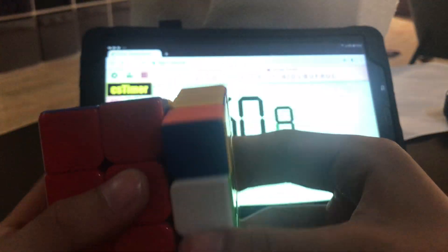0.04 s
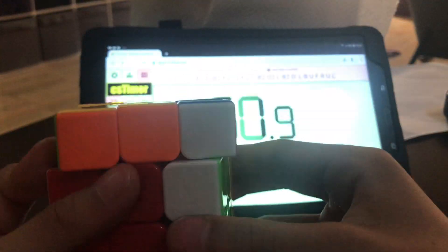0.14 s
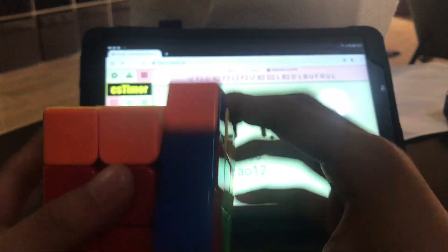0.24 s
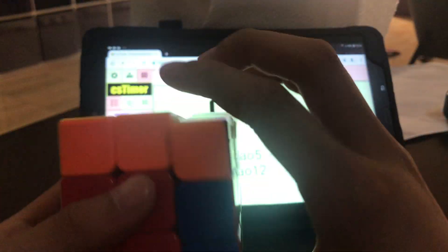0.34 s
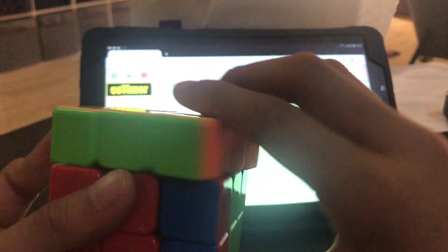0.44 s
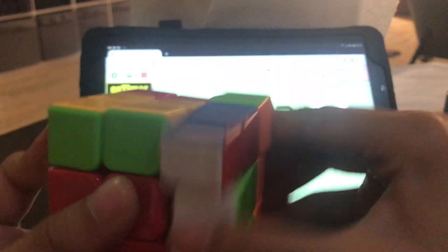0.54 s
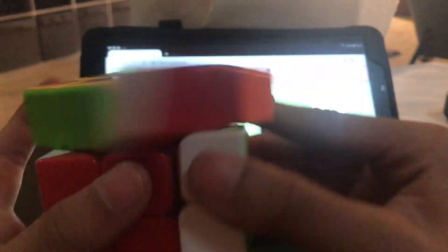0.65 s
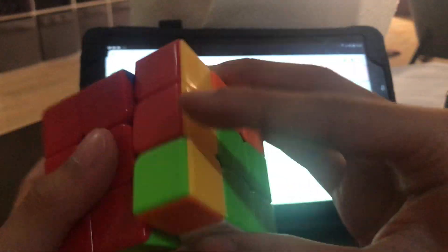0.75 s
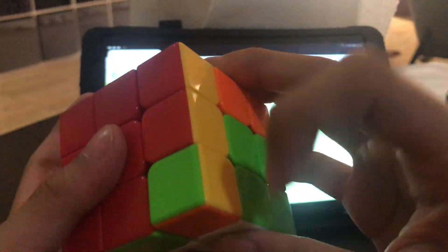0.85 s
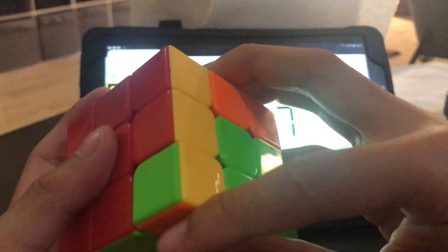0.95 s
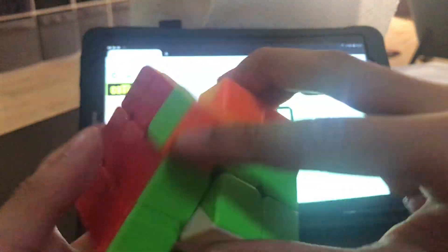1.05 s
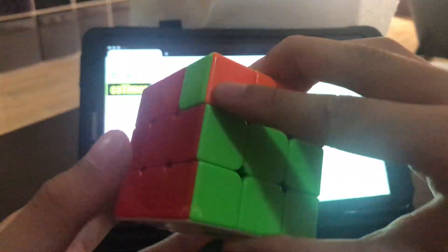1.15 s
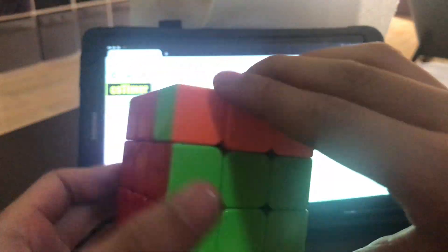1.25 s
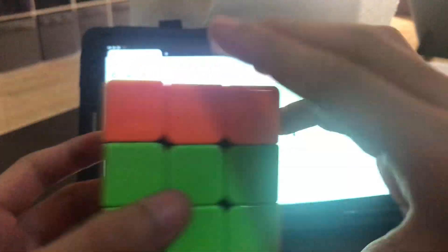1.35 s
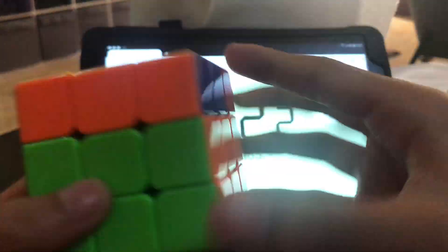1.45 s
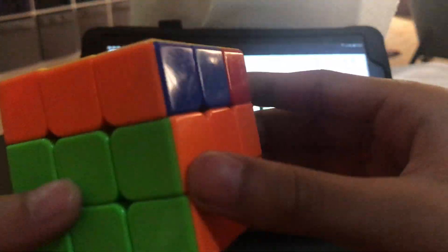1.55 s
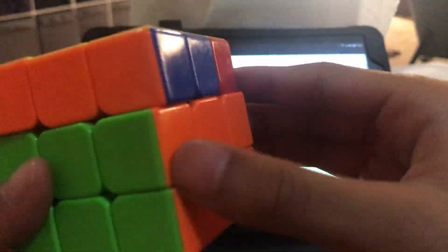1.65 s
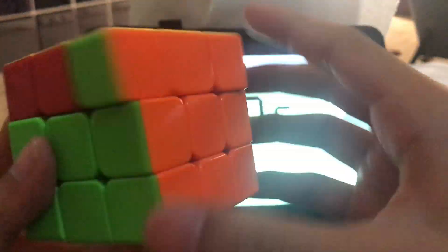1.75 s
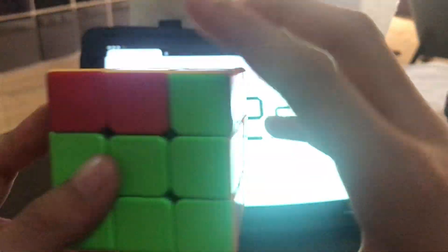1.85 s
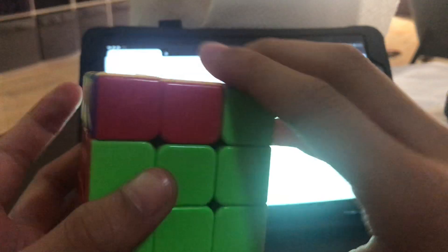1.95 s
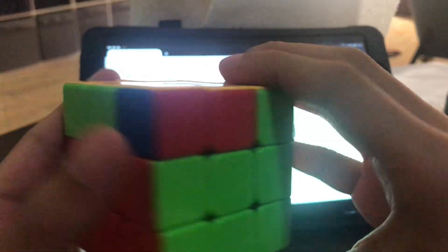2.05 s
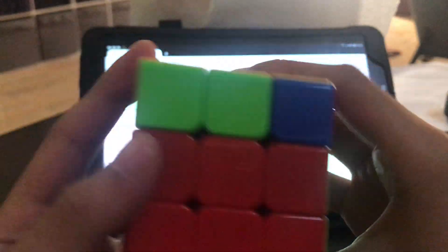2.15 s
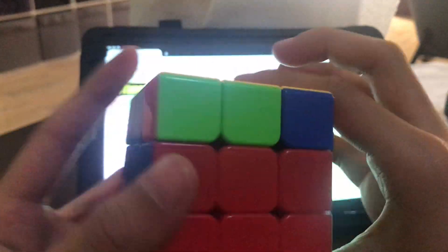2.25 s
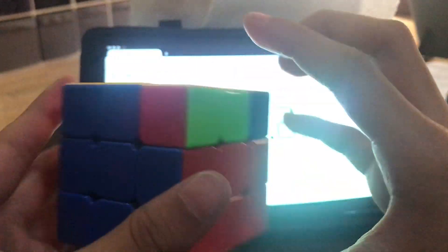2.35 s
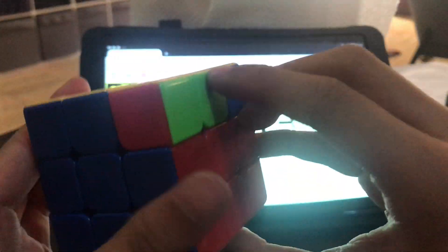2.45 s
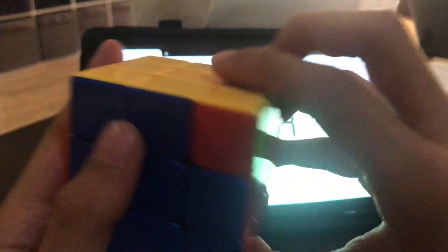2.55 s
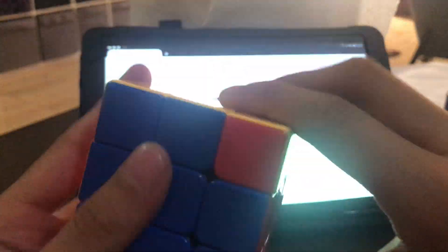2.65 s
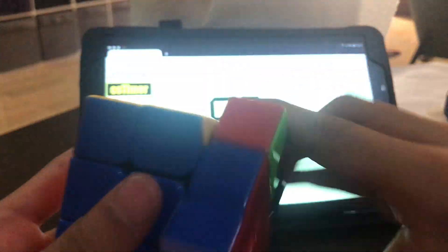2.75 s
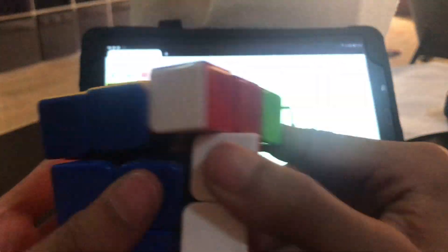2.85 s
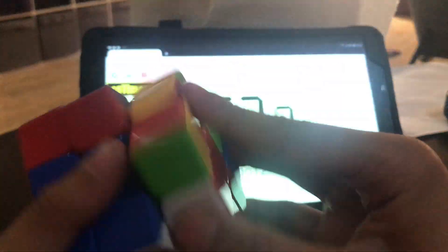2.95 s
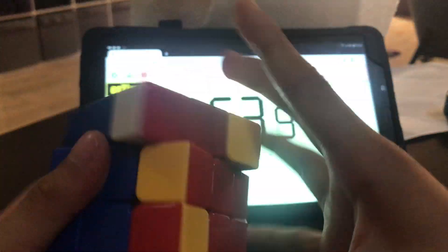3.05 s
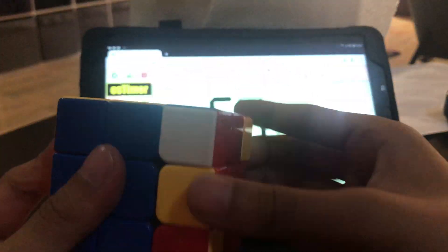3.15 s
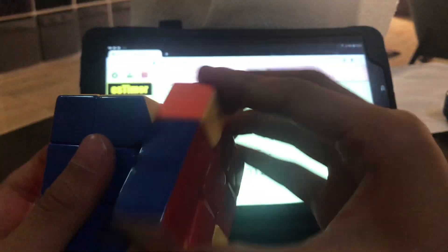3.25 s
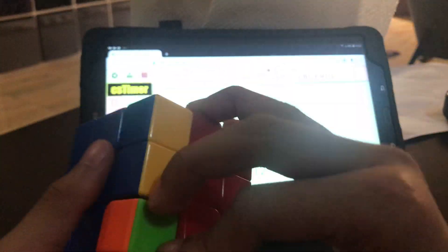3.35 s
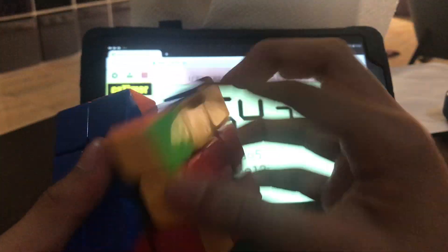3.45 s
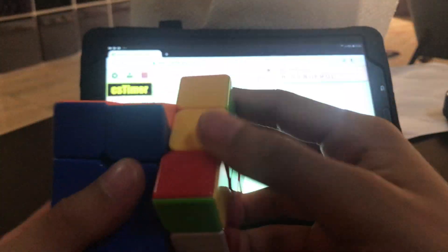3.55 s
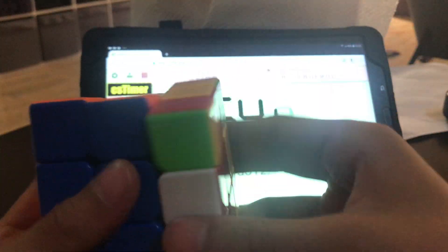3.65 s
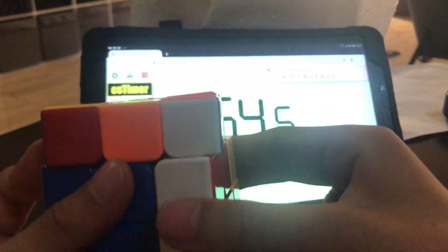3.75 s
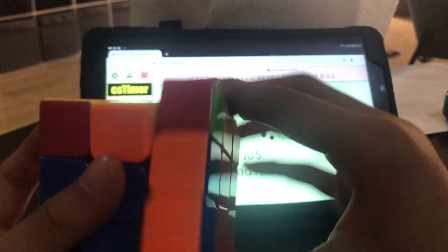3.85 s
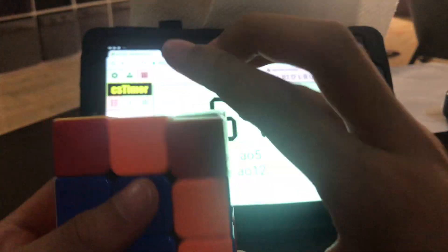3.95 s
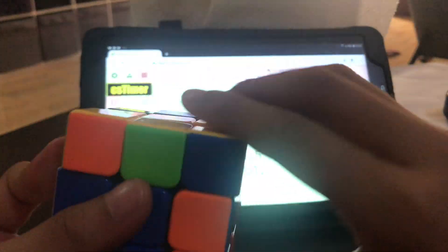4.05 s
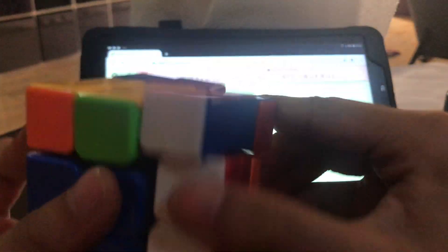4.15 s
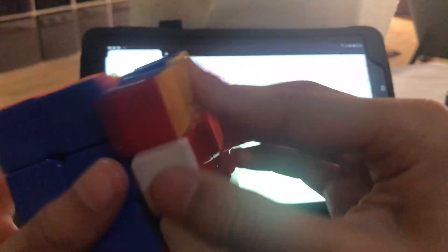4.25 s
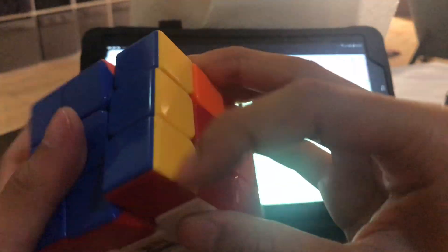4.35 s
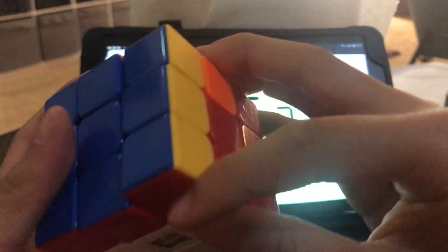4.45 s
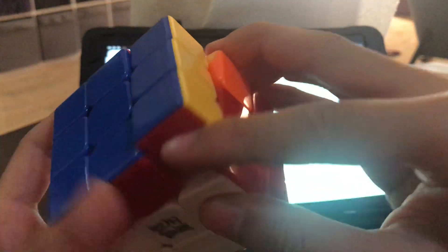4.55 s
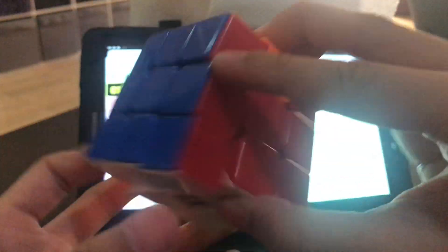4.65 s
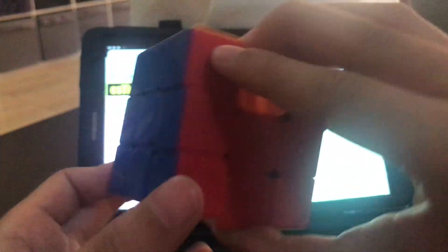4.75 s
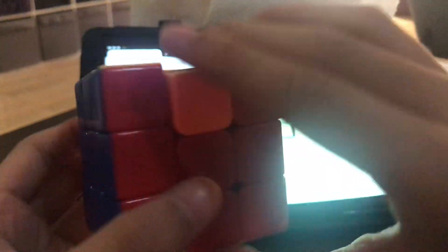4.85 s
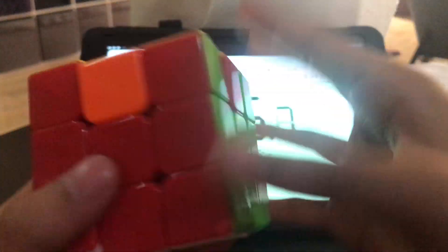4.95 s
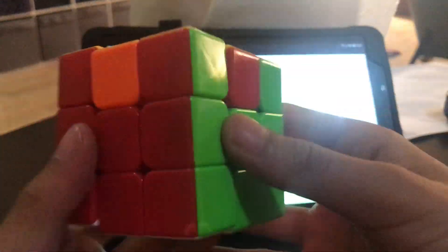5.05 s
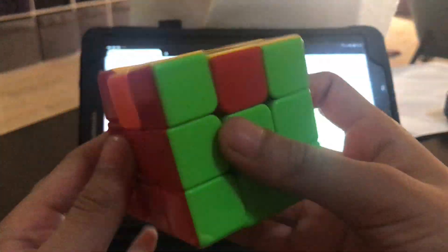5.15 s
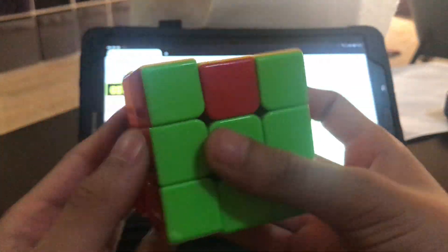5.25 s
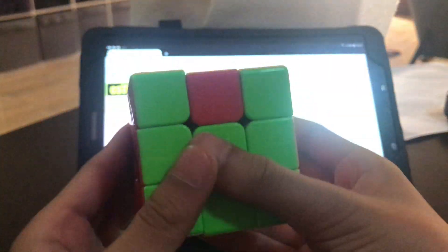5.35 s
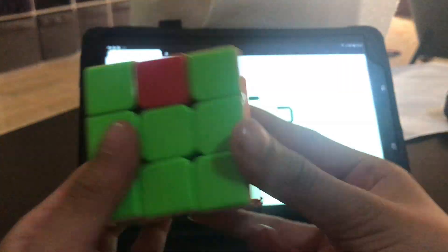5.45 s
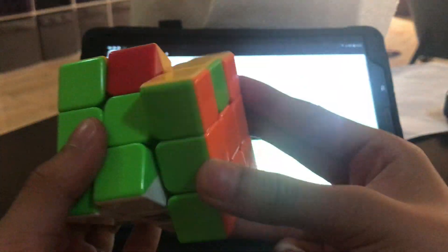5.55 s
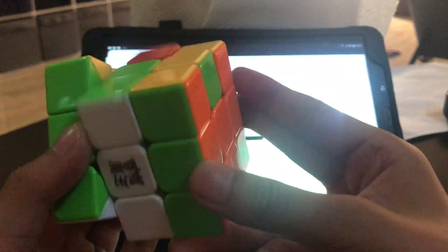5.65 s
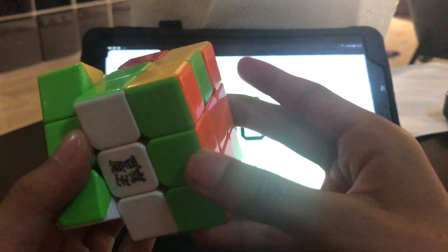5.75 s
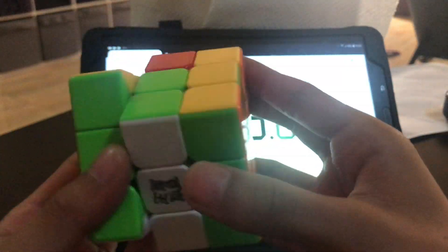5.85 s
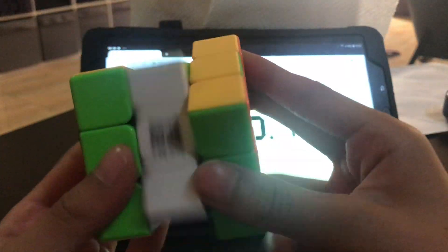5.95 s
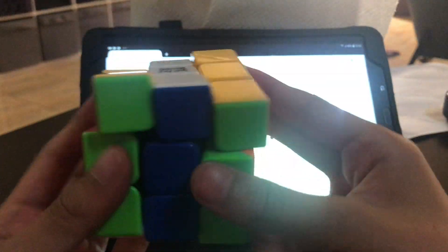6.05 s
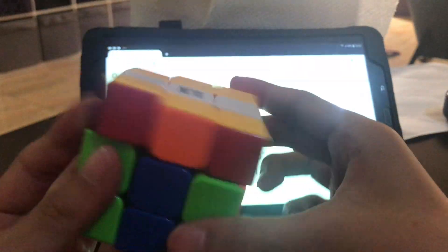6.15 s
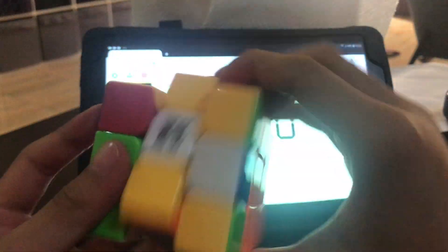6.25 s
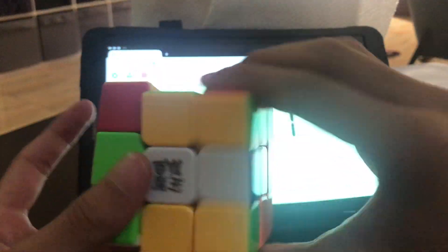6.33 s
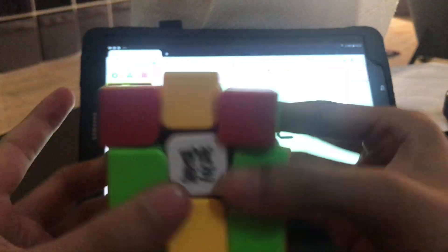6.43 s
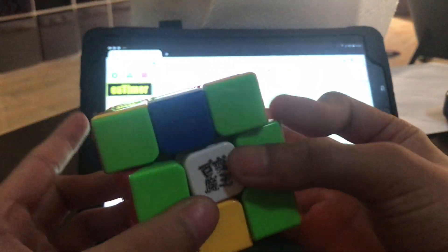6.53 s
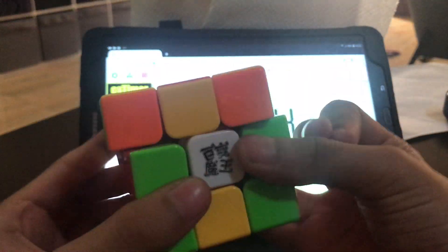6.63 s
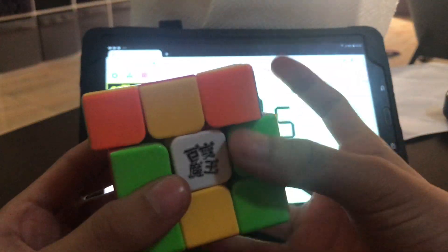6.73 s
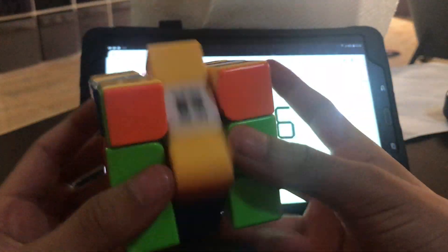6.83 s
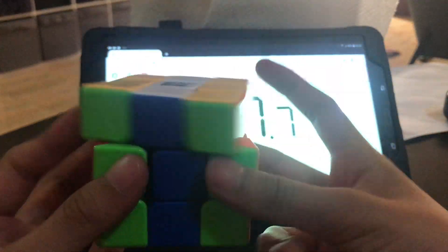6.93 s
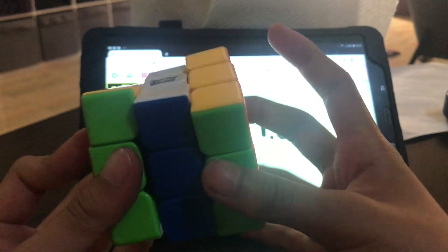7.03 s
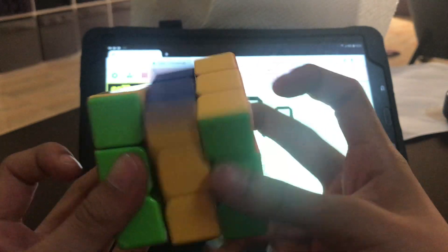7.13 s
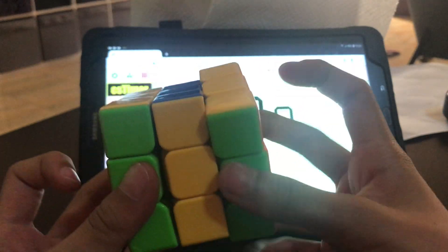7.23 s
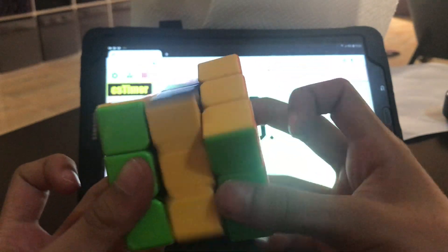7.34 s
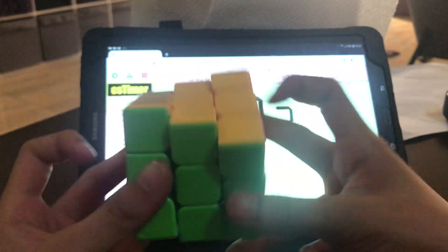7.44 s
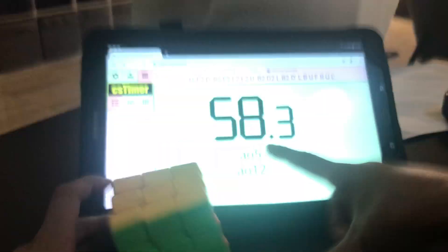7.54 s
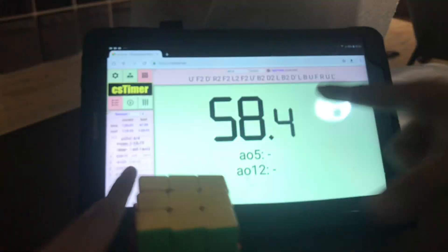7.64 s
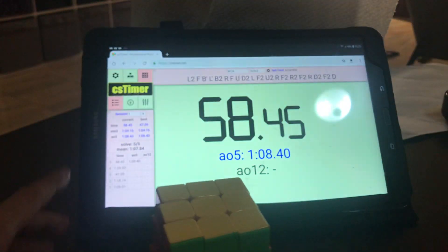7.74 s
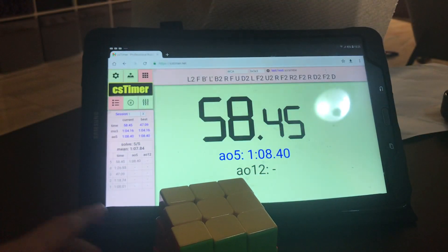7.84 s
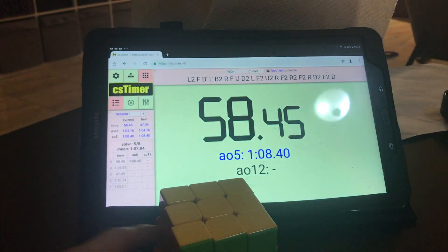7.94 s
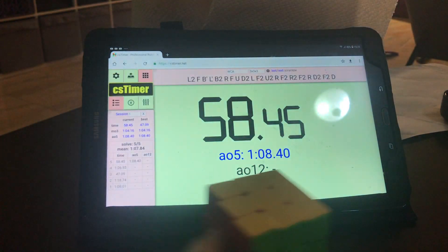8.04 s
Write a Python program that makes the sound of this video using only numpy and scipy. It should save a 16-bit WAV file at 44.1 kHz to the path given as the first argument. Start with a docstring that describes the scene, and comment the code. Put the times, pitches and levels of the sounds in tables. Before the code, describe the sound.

A plastic puzzle cube is twisted in quick bursts of sharp clicks and scrapes close up, then dropped with a loud clatter on a table.

```python
"""In a small room, a plastic puzzle cube is twisted fast close to a phone, then dropped on the table.
Turning layers scrape by stick-slip, and their hollow pieces rattle and snap home as decaying modes and crackle;
between turns loose pieces tick in the hands. The landing is a burst of clatter over the boom of the table top.
Filtered noise gives a low rumble with a faint hiss, and noise bands that follow the energy give the echo."""
import sys
import numpy as np
from scipy import signal
from scipy.fft import rfft, irfft, next_fast_len
from scipy.io import wavfile
from scipy.ndimage import uniform_filter1d

SR = 44100
rng = np.random.default_rng(int(sys.argv[2]) if len(sys.argv) > 2 else 0)


def generate_wav(sig):
    """Save sig (samples, or channels by samples) to the path in sys.argv[1] as 16-bit PCM at SR."""
    pcm = np.round(np.clip(np.atleast_2d(sig).T, -1, 1) * 32767).astype(np.int16)
    wavfile.write(sys.argv[1], SR, pcm)


N = 356769

# noise spectrum of the room's rumble and hiss: frequency_hz, relative_level_db (per Hz)
AIR_SPECTRUM = [(21, -68), (35, 3.5), (88, -1), (180, 0), (252, -0.5), (379, -7.5), (454, -13.5),
                (602, -12.5), (702, -18), (1000, -13.5), (2000, -20.5), (4920, -34.5), (6200, -30.5),
                (8870, -36.5), (10300, -37.5), (13400, -32.5), (16000, -63)]
# fingers rubbing as they shift their grip: time_s, relative_level_db
GRIP_LEVEL = [(0.0, -56), (0.7, -51), (0.98, -65), (1.2, -57), (1.4, -72), (1.66, -65), (1.86, -53),
              (1.93, -68), (2.68, -64.5), (2.86, -47.5), (3.25, -53), (4.66, -54.5), (4.86, -59.5),
              (5.42, -65.5), (5.6, -51.5), (5.96, -58), (6.45, -51.5), (7.55, -57.5), (7.7, -68)]
# quarter turns of a layer: start_s, length_s, rattle_level_db (typical knock, over 5 ms)
QUARTER_TURNS = [(0.186, .075, -35.5), (0.295, .08, -38.5), (0.509, 0.073, -43.5), (0.599, .055, -34),
                 (0.656, .055, -35.5), (0.769, 0.058, -32.5), (1.094, 0.085, -42.5), (1.789, 0.038, -43.5),
                 (2.876, .055, -33), (2.992, .06, -32), (3.053, .06, -30), (3.313, 0.099, -34.5),
                 (3.413, 0.03, -34.5), (3.521, .09, -31.5), (3.80, 0.046, -36.5), (3.906, 0.066, -35),
                 (4.09, 0.081, -33.5), (4.191, .065, -33), (4.268, 0.09, -35.5), (4.357, .07, -37.5),
                 (4.719, 0.054, -40), (5.70, .07, -32), (6.075, 0.037, -34.5), (6.228, .045, -35.5),
                 (6.312, 0.065, -34), (6.462, .07, -34.5), (6.586, 0.049, -31), (6.695, 0.029, -29.5),
                 (6.931, 0.059, -28.5), (7.019, .03, -32.5), (7.228, 0.045, -28.5), (7.47, 0.027, -33)]
# clear knocks, as pieces catch or snap home: hit_s, level_db (over 5 ms), main_resonance_hz, chatter_ms
CLEAR_KNOCKS = [(0.0567, -31.5, 2510, 2.1), (0.1901, -31, 2100, 3.9), (0.2058, -31, 8700, 2.7),
                (0.2188, -18, 2970, 0.45), (0.3113, -29, 1310, 6.7), (0.3572, -23.5, 11600, 5.9),
                (0.3627, -17, 15400, 3.9), (0.5063, -31.5, 3230, .3), (0.539, -24, 2800, .3),
                (0.6018, -26, 2900, 1.8), (0.608, -32, 1600, 2.1), (0.6438, -21, 14500, 1.2),
                (0.7555, -24.5, 5940, .8), (0.7691, -22.5, 8540, 2.2), (0.7727, -16, 5850, 2.5),
                (0.7836, -18.5, 5130, 0.91), (0.8062, -22, 5440, 1), (0.8228, -13, 10600, 10.4),
                (1.1229, -33, 2385, 1.2), (1.1706, -34, 12500, 1), (1.1746, -28, 3900, 1.7),
                (1.2276, -43, 1300, 1.7), (1.3666, -44, 1900, 3), (1.4834, -45.5, 1310, 0.67),
                (1.7965, -41.5, 1500, 5.6), (1.8125, -29, 11100, 0.23), (1.8204, -37.5, 2300, 1),
                (2.133, -47.5, 1600, 4), (2.2459, -43, 5450, 0.27), (2.295, -41, 1757, 9.1),
                (2.4691, -52, 7600, .6), (2.731, -44.5, 1710, 1), (2.8161, -40, 1300, .6),
                (2.8785, -29, 1730, 1.9), (2.9178, -20, 5000, 3), (2.9264, -23.5, 11400, 1),
                (3.0096, -17.5, 5540, 1), (3.0234, -20, 7700, 2.1), (3.0428, -16, 3000, 0.36),
                (3.047, -17, 14700, 0.98), (3.0678, -12, 11100, 2.2), (3.0732, -16.5, 9300, 3.1),
                (3.1591, -29, 3220, 0.79), (3.2666, -38.5, 4130, 1.2), (3.3157, -28, 3050, .3),
                (3.3545, -24.5, 4440, 0.45), (3.4032, -29, 1260, 1.7), (3.42, -17, 15200, .8),
                (3.4304, -17, 5370, 4.6), (3.5649, -26, 3220, .5), (3.5853, -23.5, 12100, 1),
                (3.6042, -23.5, 3600, 2.2), (3.7839, -31, 1500, 2.2), (3.8, -20.5, 2070, 0.5),
                (3.8183, -16.5, 4770, 0.78), (3.855, -30, 1400, 3.1), (3.9063, -26.5, 6400, 3.1),
                (3.9502, -19, 2450, 1.2), (3.9545, -20, 8700, 0.53), (4.0983, -31, 2100, 2.3),
                (4.1237, -23, 5060, 5.2), (4.1667, -25, 5040, .6), (4.1883, -26, 4500, .3),
                (4.2244, -15, 15600, 3.4), (4.3214, -21, 10000, 1.6), (4.3275, -22.5, 2700, 3.8),
                (4.3664, -25, 2350, 2.3), (4.3734, -14, 5470, 3.3), (4.42, -23.5, 14700, 0.46),
                (4.4241, -22.5, 6000, 3.9), (4.6576, -37.5, 1490, 6.2), (4.7344, -29.5, 4300, .3),
                (4.7704, -24.5, 1630, 3.6), (5.0198, -42.5, 1367, 1.1), (5.1246, -40, 1290, 3.7),
                (5.2088, -45.5, 5100, 1.4), (5.2712, -38.5, 4900, 3.5), (5.3429, -40.5, 1863, 0.84),
                (5.4626, -39.5, 1300, 1.33), (5.6062, -31, 5860, 0.22), (5.7605, -17, 2730, 4.2),
                (5.9646, -40, 3600, 0.41), (6.0151, -36, 3180, 0.18), (6.0565, -31.5, 1300, 9.1),
                (6.0774, -20, 3040, 1.7), (6.0951, -14.5, 8500, 2.3), (6.104, -12, 5570, 0.52),
                (6.2408, -23, 10000, 9.5), (6.2635, -22, 6240, 3.7), (6.3401, -20.5, 12700, 2.4),
                (6.3639, -18, 4130, 10.3), (6.5696, -24.5, 3400, 6.9), (6.703, -17, 15100, 1.8),
                (6.7069, -21.5, 15100, 9.1), (6.7215, -16, 6070, 0.51), (6.9345, -26, 2100, 2.1),
                (6.9596, -15, 4300, 6.2), (6.9773, -18.5, 8100, 1.9), (6.9846, -14, 3400, 0.48),
                (7.0399, -19.5, 8040, 2), (7.2133, -35, 1910, 3.9), (7.2387, -13.5, 12300, 4.2),
                (7.2493, -20.5, 6170, 5.3), (7.2565, -19.5, 7900, 6), (7.3027, -36, 14700, .3),
                (7.4393, -28, 1600, .3), (7.472, -14.5, 12300, 1.1), (7.4843, -15, 10700, 1.5),
                (7.4917, -19, 14300, 10), (7.5196, -25, 11500, 0.69)]
# the cube lands and rocks to rest: hit_s, clatter_db (over 5 ms), main_resonance_hz, chatter_ms, thud_relative_db
LANDING_BLOWS = [(7.6103, -49, 1300, 3, -25.5), (7.617, -40, 1500, 1.1, -26),
                 (7.621, -10.5, 12000, 12, -19.5), (7.6272, -12, 3800, 5.8, -18),
                 (7.6329, -13.5, 9000, 3.2, -38), (7.6387, -13.5, 4600, 5, -24),
                 (7.7258, -29, 1700, 1.4, -33.5), (7.734, -39.5, 5350, 1.7, -44),
                 (7.777, -56, 3600, 3, -44), (7.8514, -44.5, 3980, 2, -42.5)]
# modes of a hollow piece: nominal_hz, relative_level_db, t60_s
PIECE_MODES = [(1626, -8.5, 0.05), (2860, -12, 0.033), (3370, 2, 0.018), (4140, 1, 0.029),
               (5670, 14, 0.0051), (6250, 6, 0.018), (6900, 5, 0.0086), (8690, 3, 0.011), (9320, -7, 0.043),
               (11870, 12.5, 0.0078), (13000, -5, 0.0066), (12960, -5, 0.053)]
# radiation colour of the plastic shell: frequency_hz, relative_level_db
SHELL_COLOUR = [(100, -31), (350, -14), (700, -15), (1150, -7), (1700, -2.5), (3000, -1.5), (4850, -4),
                (6000, -2), (8600, -2.5), (10400, -10), (11800, -8.5), (15500, -12)]
# modes of the table top: nominal_hz, relative_level_db, t60_s
TABLE_MODES = [(63.3, -6, 0.46), (118, -4.5, 0.59), (151.4, -2, 0.17), (238, -14, 0.14),
               (296.6, -3.5, 0.27), (346, 6, 0.067), (510, -10.5, 0.18), (767, -9.5, 0.22)]
# colour of the table's dull knock: frequency_hz, relative_level_db
THUMP_COLOUR = [(50, -25), (140, 7), (340, 3.5), (600, -2), (1200, -0.5), (2500, -9), (8000, -42)]
# room echo by band: centre_hz, relative_level_db, t60_s
ECHO_BANDS = [(121, 5, 0.83), (325, 6, 0.76), (774, -1, 0.22), (1510, -0.5, 0.59), (3180, -3, 0.82),
              (6120, -5, 0.51), (10000, -8.5, 0.39), (16000, -5, 0.19)]

RUMBLE_DB = -52.5  # level around which the background wanders
TOP_HZ = 15900  # upper limit of the phone
LEAD_SAMPLES = 400  # faint noise before a knock
# a turning layer: its scrape against its rattle, and how fast the scrape starts and stops
SCRAPE_DB, SCRAPE_RISE_DB_PER_S, SCRAPE_FALL_DB_PER_S = -7.5, 1600, 703
# light knocks in a turn: typical main resonance, its spread and typical chatter length
LIGHT_HZ, LIGHT_SPREAD_OCTAVES, LIGHT_CHATTER_MS = 2710, 1.0, 0.55


def undb(db):
    """Decibel law: level to amplitude gain."""
    return 10 ** (np.asarray(db) / 20)


def unit(x):
    """Energy normalisation: scale the sum of squares to 1."""
    return x / np.sqrt(np.sum(x ** 2) + 1e-18)


def add(track, s, sound):
    """Superposition: mix a sound into a track at time s."""
    i = int(np.clip(s * SR, 0, N - 1))
    track[i:i + len(sound)] += sound[:N - i]


def log_frequency(size):
    """Logarithmic frequency axis of a spectrum, from 1 Hz upward."""
    return np.log(np.maximum(np.fft.rfftfreq(size, 1 / SR), 1))


def colour(points, size):
    """Minimum phase: a causal frequency response through (Hz, dB) points, by folding the cepstrum."""
    hz, db = np.transpose(points)
    log_gain = np.log(undb(np.interp(log_frequency(size), np.log(hz), db)))
    cepstrum = irfft(log_gain, size)
    cepstrum[1:size // 2] *= 2
    cepstrum[size // 2 + 1:] = 0
    return np.exp(rfft(cepstrum))


def shape(x, points):
    """Linear filtering: give a long sound a colour."""
    size = next_fast_len(N + N // 8)
    return irfft(rfft(x, size) * colour(points, size), size)[:N]


def fade(t, t60):
    """Exponential free decay: 60 dB in t60 seconds."""
    return np.exp(-np.log(1000) * t / t60)


def background(wander_db=1.64, count=17):
    """Filtered noise: a low room rumble with a faint hiss, at a slowly wandering level."""
    wander = np.interp(np.arange(N), np.linspace(0, N, count), rng.standard_normal(count))
    noise = unit(shape(rng.standard_normal(N), AIR_SPECTRUM)) * np.sqrt(N)
    return noise * undb(RUMBLE_DB + wander_db * wander)


def sliding_db(grip_db):
    """Sliding friction: the level rises at each turn, holds as the layer moves and falls back to the grip's."""
    t = np.arange(N) / SR
    level = np.interp(t, *np.transpose(GRIP_LEVEL)) + grip_db
    for start, length, db in QUARTER_TURNS:
        rise_db = SCRAPE_RISE_DB_PER_S * (t - start)
        fall_db = SCRAPE_FALL_DB_PER_S * (start + length - t)
        ramp_db = np.minimum(rise_db, fall_db)
        level = np.maximum(level, db + SCRAPE_DB + np.minimum(ramp_db, 0))
    return level


def scrape(slide_db, tilt_db, gain_db, slips_per_s=70, crowding=0.96, spread_db=5.5, slip_t60=0.016, size=1024):
    """Stick-slip: faces catch and let go, as lone ticks under a light grip and a dense crackle in a turn."""
    density = undb(crowding * (slide_db - np.mean(slide_db)))
    slip_size = undb(spread_db * np.minimum(rng.exponential(size=N), 3))
    happens = rng.random(N) < density * slips_per_s / SR
    # denser slips are weaker, so that crowding alone leaves the mean power unchanged
    slips = happens * slip_size ** 2 / density
    decay = fade(np.arange(size) / SR, slip_t60)
    power = np.abs(signal.fftconvolve(slips, decay ** 2)[:N])
    power = power + .12 * np.mean(power)  # a soft rub joins the slips
    envelope = np.sqrt(uniform_filter1d(power, size=40))
    tilted = [(hz, level + tilt_db * np.log2(hz)) for hz, level in SHELL_COLOUR]  # tilt in dB per octave
    grains = unit(shape(envelope * rng.standard_normal(N), tilted)) * np.sqrt(N)
    return grains * undb(gain_db + slide_db)


def ring(modes, t, detune, scatter_db):
    """Modal superposition: decaying sines whose pitch and level vary a little from blow to blow."""
    hz, db, t60 = np.transpose(modes)[:, :, None]
    shift, strength = rng.standard_normal((2, len(modes), 1))
    amplitude = undb(db + scatter_db * strength) * fade(t, t60)
    return np.sum(amplitude * np.sin(2 * np.pi * hz * (1 + detune * shift) * t), axis=0)


def voicing(hz, size, peak_db=6, width_octaves=0.26, hardness_db=0.8):
    """Contact stiffness: one resonance is favoured, and a hard, high contact is brighter than a soft, low one."""
    octaves = np.log2(np.clip(np.fft.rfftfreq(size, 1 / SR), 1000, 15000) / hz)
    pitch = np.log2(hz / 4000)  # octaves from a neutral contact
    peak = peak_db * np.exp(-(octaves / width_octaves) ** 2 / 2)
    return undb(peak + hardness_db * pitch * octaves)


def knock(db, hz, chatter_ms, shell, crack_t60=0.0092, linger_db=-28, linger_t60=0.051, ring_db=-8,
          bounce_db=-2, bounces_per_ms=2.2, lead_db=-16, lead_t60=0.025, size=2048):
    """Repeated impact: a piece hits its neighbour and chatters; each contact crackles and rings the hollow shell."""
    t = np.arange(size // 2) / SR
    bounces = rng.random(len(t)) < bounces_per_ms * 1000 / SR
    dying = np.exp(-(t * 1000 / max(chatter_ms, .1)) ** 2)
    blows = bounces * rng.standard_normal(len(t)) * undb(bounce_db) * dying
    blows[0] = 1
    # every contact dies at once, while early reflections from the hands and table linger more softly
    decay = fade(t, crack_t60) + undb(linger_db) * fade(t, linger_t60)
    power = signal.fftconvolve(blows ** 2, decay ** 2)[:len(t)]
    crack = np.sqrt(np.abs(power)) * rng.standard_normal(len(t))
    # a faint noise swells just before each knock; differencing makes it thinner
    swell = undb(lead_db) * fade(t[:LEAD_SAMPLES], lead_t60)[::-1]
    lead = swell * np.diff(rng.standard_normal(LEAD_SAMPLES + 1))
    crackle = unit(np.concatenate([lead, crack]))
    modes = unit(signal.fftconvolve(blows, ring(PIECE_MODES, t, detune=0.038, scatter_db=2))[:len(t)])
    contact = crackle + undb(ring_db) * np.pad(modes, (LEAD_SAMPLES, 0))
    sound = irfft(rfft(contact, size) * shell * voicing(hz, size))
    return unit(sound) * undb(db) * np.sqrt(.005 * SR)  # level referred to 5 ms


def clatter(rows, size=2048):
    """Superposed impacts: a run of knocks, each placed so that its hit falls on the stated time."""
    out, shell = np.zeros(N), colour(SHELL_COLOUR, size)
    for s, db, hz, chatter_ms, *_ in rows:
        add(out, s - LEAD_SAMPLES / SR, knock(db, hz, chatter_ms, shell))
    return out


def light_knocks(times, db, scatter_db, hz, chatter_ms):
    """Random impacts: rows of light knocks that differ by chance in strength, resonance and chatter."""
    force, pitch, chatter = np.clip(rng.standard_normal((len(times), 3)), -1.7, 1.7).T
    resonance = np.clip(hz * 2 ** (LIGHT_SPREAD_OCTAVES * pitch), 1200, 15000)
    return list(zip(times, db + scatter_db * force, resonance, chatter_ms * 2 ** chatter))


def grip_ticks(tick_db=-52, follows_grip=0.91, scatter_db=4.5, tick_hz=1900, chatter_ms=1.0, count=180):
    """Loose coupling: pieces tick in the hands until the landing, louder when the fingers are busy."""
    s, grip_db = np.transpose(GRIP_LEVEL)
    times = LANDING_BLOWS[0][0] * (np.arange(count) + rng.random(count)) / count
    db = tick_db + follows_grip * (np.interp(times, s, grip_db) - np.mean(grip_db))
    return clatter(light_knocks(times, db, scatter_db, tick_hz, chatter_ms))


def rattle(scatter_db=4.0, count=7):
    """Impact rate: each turn has the same number of bumps, so a quick turn rattles more densely."""
    rows = []
    for start, length, db in QUARTER_TURNS:
        times = start + length * (np.arange(count) + rng.random(count)) / count
        rows += light_knocks(times, db, scatter_db, LIGHT_HZ, LIGHT_CHATTER_MS)
    return clatter(rows)


def room(x, build_s=0.0013):
    """Diffuse reverberation: each band stores the sound's energy and lets it die at its own rate."""
    t = np.arange(int(.8 * SR)) / SR
    size = next_fast_len(N)
    sound, noise = rfft(x, size), rfft(rng.standard_normal(size))
    log_hz, centres = log_frequency(size), np.log(np.array(ECHO_BANDS)[:, 0])
    out = 0
    for (_, db, t60), peak in zip(ECHO_BANDS, np.eye(len(ECHO_BANDS))):
        band = np.interp(log_hz, centres, peak)  # triangular bands that overlap
        decay = unit(fade(t, t60) * (1 - np.exp(-t / build_s)))
        band_sound = irfft(sound * band, size)[:N]
        energy = signal.fftconvolve(band_sound ** 2, decay ** 2)[:N]
        band_noise = unit(irfft(noise * band, size)[:N])
        out = out + undb(db) * np.sqrt(np.abs(energy) * N) * band_noise
    return out


def thuds(ring_db=-9.5, thump_db=8.0, thump_t60=0.082):
    """Plate excitation: each landing blow gives a dull noise knock and sets the table's modes booming briefly."""
    booms, pushes, t = np.zeros(N), np.zeros(N), np.arange(SR // 2) / SR
    for s, *_, db in LANDING_BLOWS:
        boom = ring(TABLE_MODES, t, detune=.008, scatter_db=1)
        add(booms, s, undb(db + ring_db) * boom)
        push = fade(t, thump_t60) * rng.standard_normal(len(t))
        add(pushes, s, undb(db + thump_db) * push)
    return booms + shape(pushes, THUMP_COLOUR)


def scene(turn_room_db=-18.0, land_room_db=-10.5, thud_room_db=-17):
    """Direct and reverberant sound: turns have little echo; the loud landing has a stronger echo tail."""
    faces = scrape(sliding_db(grip_db=-1), tilt_db=-2.5, gain_db=-3.0)  # flat faces rub dully, mostly during turns
    edges = scrape(sliding_db(grip_db=5.0), tilt_db=1.5, gain_db=-5.0)  # edges and fingertips rub brightly
    turning = faces + edges + grip_ticks() + clatter(CLEAR_KNOCKS) + rattle()
    landing, table = clatter(LANDING_BLOWS), thuds()
    echo = room(undb(turn_room_db) * turning + undb(land_room_db) * landing + undb(thud_room_db) * table)
    return (background() + turning + landing + table + echo)[None]


def record(dry, ceiling=1.0, low_cut_hz=50):
    """Band limiting and saturation: the phone drops deep bass, rounds the sharpest peaks and cuts the top."""
    high_pass = signal.butter(4, low_cut_hz, "high", fs=SR, output="sos")
    low_pass = signal.ellip(10, .2, 70, TOP_HZ, fs=SR, output="sos")  # 0.2 dB ripple, 70 dB rejection
    heard = signal.sosfilt(high_pass, dry)
    rounded = ceiling * np.tanh(heard / ceiling)
    return signal.sosfilt(low_pass, rounded)


dry = scene()
out = record(dry)
generate_wav(out)
```